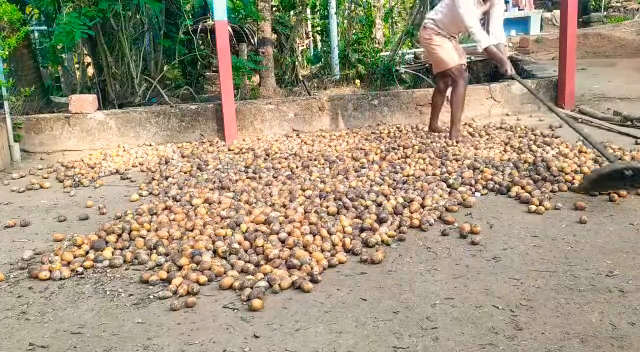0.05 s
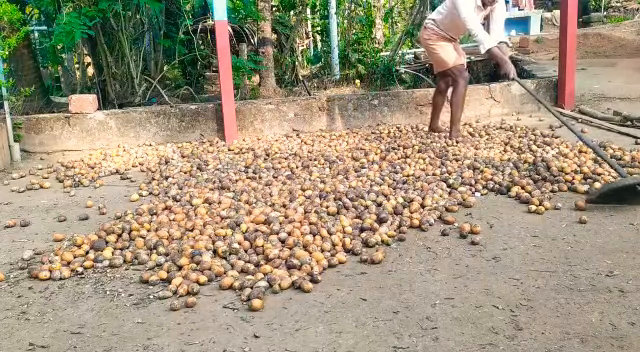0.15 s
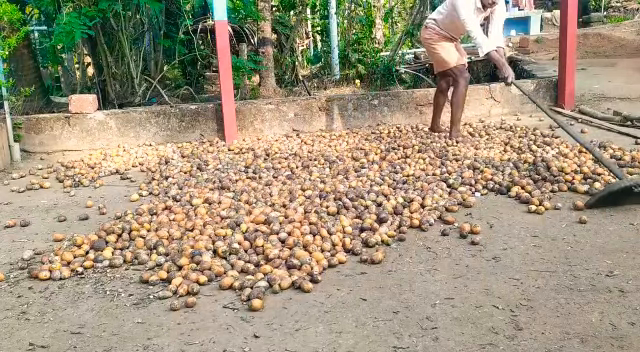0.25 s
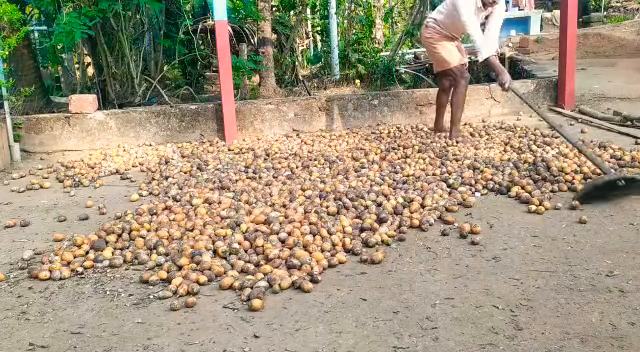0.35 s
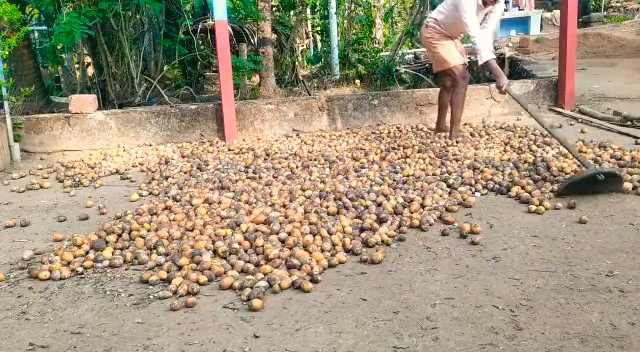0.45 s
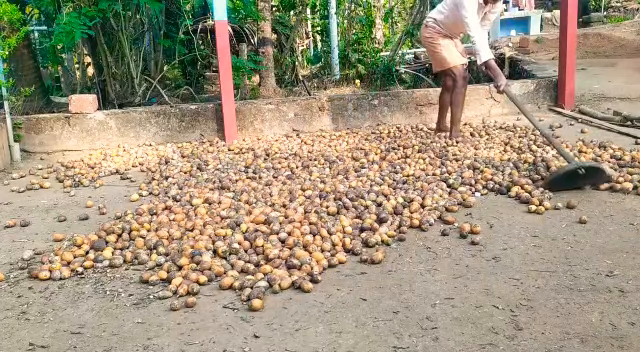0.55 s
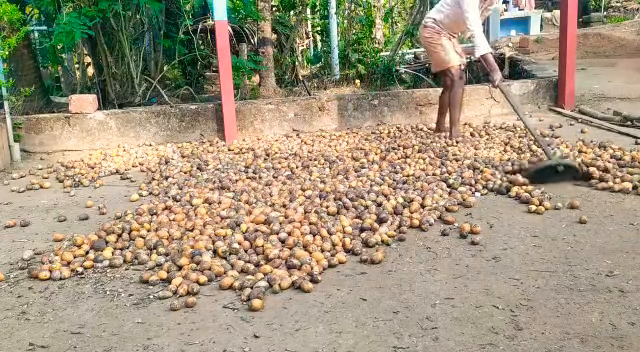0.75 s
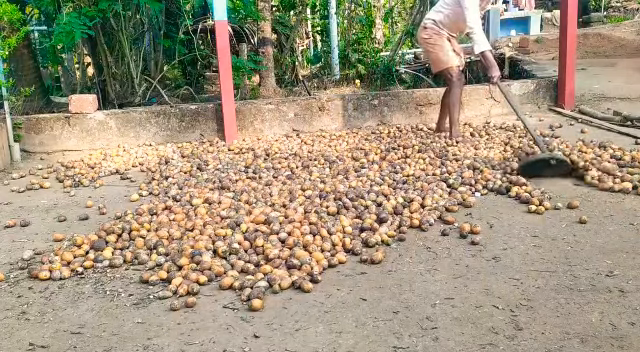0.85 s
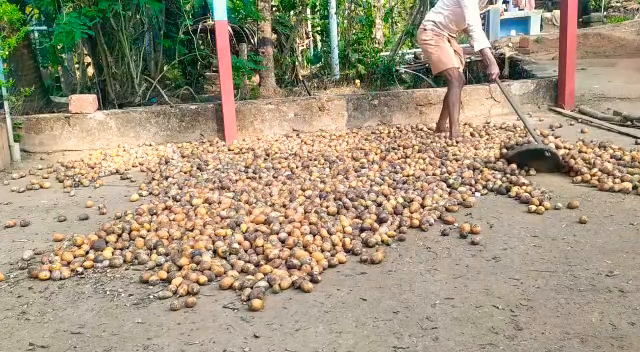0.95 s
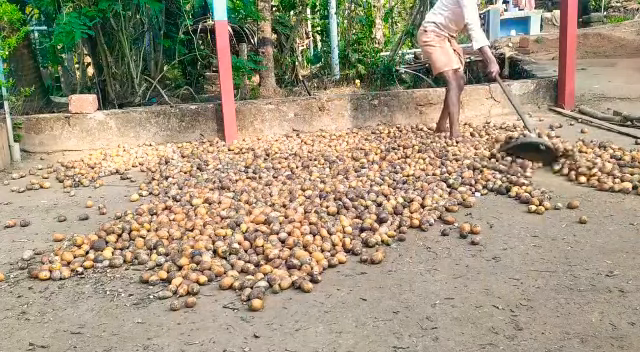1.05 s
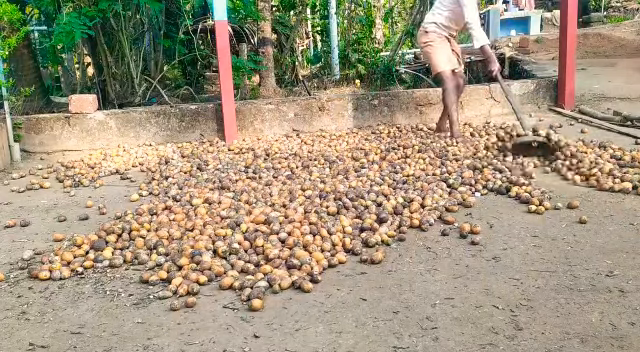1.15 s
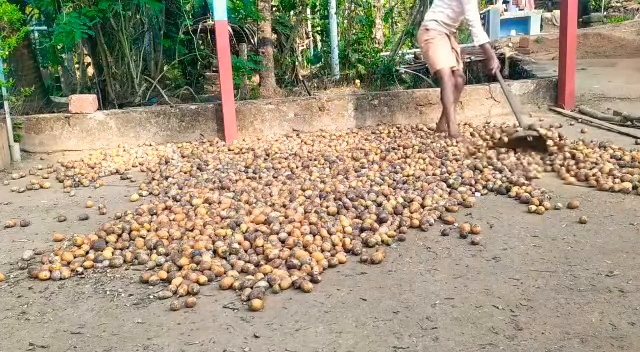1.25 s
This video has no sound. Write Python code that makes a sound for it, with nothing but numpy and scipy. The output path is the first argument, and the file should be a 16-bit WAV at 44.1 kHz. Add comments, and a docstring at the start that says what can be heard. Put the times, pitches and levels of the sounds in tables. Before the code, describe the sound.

Dried nuts clatter as a long-handled scraper rakes them outdoors. First the blade smacks the paving, then hollow husks and hard shells knock irregularly against it and roll together while the edge grinds grit with a low rumble.

```python
"""A long-handled scraper drops on a paved yard and is pulled through a heap of dried nuts.
The blade smacks down, chatters and rings in its modes. Nuts knock on it and tumble over each
other, ringing their hollow husks and hard shells. The edge grinds grit, flicks pebbles and
rumbles. Blows carry a faint yard echo; faint outdoor air lies underneath."""
import sys
import numpy as np
from scipy import signal
from scipy.fft import rfft, irfft
from scipy.io import wavfile
from scipy.ndimage import uniform_filter1d

SR = 44100
rng = np.random.default_rng(int(sys.argv[2]) if len(sys.argv) > 2 else 0)


def to_wav(sig):
    """Store sig (one row per channel, or 1-D mono) as 16-bit WAV at the path in sys.argv[1].

    Samples outside -1..1 are clipped; the rate is SR.
    """
    pcm = np.clip(np.atleast_2d(sig), -1, 1) * 32767
    pcm = np.round(pcm).astype(np.int16)
    wavfile.write(sys.argv[1], SR, pcm.T)  # frames by channels


N = 57330
T = np.arange(N) / SR
DROP_S, BOUNCE_S = 0.2169, 0.0078
GRIT_CORRELATION = 0.036

# blade contacts (time [s], smack [dB], ring [dB])
LANDINGS = [(DROP_S, -7.5, -17), (DROP_S + BOUNCE_S, -11.5, -24.5), (0.22, -42, -36), (0.2455, -24, -25.5),
            (0.2522, -23.5, -35), (0.24, -30.5, -39), (0.34, -37, -38), (0.299, -38, -44)]
# damped modes of the grounded blade (frequency [Hz], level [dB], t60 [s])
SMACK_MODES = [(345, -2.5, 0.019), (793, 4.5, .02), (975, -3, 0.021), (1610, -6.5, 0.019)]
# ringing blade modes, one list per column (frequency [Hz], level [dB], t60 [s])
BLADE_HZ = [158, 195, 232, 295, 369, 506, 670, 752, 778, 897, 1018, 1328, 1537, 1800]
BLADE_DB = [-14, -12.5, -11, -6.5, -9, -11.5, -1, -9, -3, -9.5, -20.5, -16.5, -12.5, -12]
BLADE_T60_S = [0.14, 0.15, .13, 0.14, 0.033, 0.093, 0.11, 0.054, 0.13, 0.14, 0.15, 0.082, 0.065, 0.15]
BLADE_MODES = list(zip(BLADE_HZ, BLADE_DB, BLADE_T60_S))
# nuts on the blade (time [s], thud [dB], clack [dB], snap [dB], thud pitch [Hz])
KNOCKS = [(0.3568, -24.5, -32, -36.5, 340), (0.385, -35, -48, -41, 315), (0.4158, -21, -37, -33, 324),
          (0.4441, -31, -44, -42, 282), (0.48, -30.5, -35, -37.5, 380), (0.508, -38, -50, -34.5, 253),
          (0.526, -24, -23.5, -30.5, 415), (0.5349, -22.5, -26, -33, 325), (0.548, -48, -35, -54, 510),
          (0.554, -38, -28, -53, 345), (0.563, -28, -27, -64, 397), (0.5979, -32, -39.5, -35, 454),
          (0.6016, -40, -29.5, -37, 410), (0.619, -28.5, -36.5, -45.5, 403), (0.6998, -24, -46, -36.5, 383),
          (0.749, -28, -31, -47, 374), (0.806, -22.5, -29, -34.5, 460), (0.8219, -23.5, -27.5, -36, 405),
          (0.8371, -27, -36.5, -59, 410), (0.8804, -23, -33.5, -54, 330), (0.9089, -34, -37, -48, 374),
          (0.935, -47, -35, -36.5, 394), (1.0168, -30, -44, -37, 450), (1.0398, -30.5, -34, -33.5, 357),
          (1.0592, -34.5, -28.5, -38, 358), (1.0716, -42, -37, -32, 425), (1.0889, -34, -30, -39.5, 330),
          (1.1211, -33.5, -35, -41, 346), (1.135, -34, -33.5, -38, 340), (1.2216, -28, -39, -39, 308),
          (1.2619, -43, -45, -45, 308)]
# hollow husk (frequency [Hz], level [dB], t60 [s])
HUSK_MODES = [(288.6, -10, 0.055), (444, -4, 0.035), (485, -10, 0.043), (674.8, -5.5, 0.071),
              (808, -7, 0.021), (883, -7, 0.026)]
# hard shell (frequency [Hz], level [dB], t60 [s])
SHELL_MODES = [(1367, -4, .022), (1515, -8.5, 0.021), (1730, -9, 0.025), (2280, -10, 0.029)]
# tumbling of the heap (time [s], level [dB])
TUMBLE_ENVELOPE = [(0.22, -73), (0.3, -51), (0.4, -41), (0.47, -52.5), (0.535, -32), (0.59, -52.5),
                   (0.66, -44.5), (0.74, -41), (0.84, -41.5), (0.97, -50), (1.05, -43.5), (1.17, -42.5),
                   (1.3, -42)]
# edge grinding on paving (time [s], level [dB])
SCRAPE_ENVELOPE = [(0.2, -70), (0.206, -64), (0.218, -58), (0.238, -34.5), (0.344, -56.5), (0.408, -57.5),
                   (0.414, -52.5), (0.474, -60.5), (0.536, -43.5), (0.566, -45), (0.572, -50.5),
                   (0.852, -50.5), (0.952, -54.5), (1.142, -49), (1.154, -42), (1.254, -49), (1.3, -49.5)]
# grit under the pressed blade (frequency [Hz], level [dB])
COARSE_SPECTRUM = [(880, -25), (1500, -2), (1990, -9), (2220, -6.5), (3540, -1.5), (4100, -6), (4710, -2.5),
                   (7520, -9), (8370, -7), (13100, -19.5), (15500, -26)]
# grit under the skimming blade (frequency [Hz], level [dB])
FINE_SPECTRUM = [(880, -46), (1500, -6.5), (1700, -11.5), (1880, -15), (2640, -6.5), (3650, -4.5),
                 (4850, -2.5), (8050, 0.5), (15500, -16)]
# grit balance (frequency [Hz], left minus right [dB])
GRIT_BALANCE = [(1500, -5), (3500, 1.5), (8000, 2.5), (13000, 0.5)]
# pebble pings (frequency [Hz], level [dB])
PEBBLE_MODES = [(2350, 0.5), (2750, -8), (3250, 3.5), (3590, 9.5), (4500, 1), (4900, 3.5), (5600, -11),
                (6300, 0), (7200, -12), (8300, -9), (9300, -22), (11500, -11)]
# larger grit cracking (time [s], level [dB])
CRUSHES = [(0.233, -35), (0.2385, -40), (0.29, -47), (0.529, -38), (0.563, -49), (0.81, -50),
           (0.832, -44.5), (0.868, -44), (1.187, -43)]
# drag rumble (time [s], level [dB])
RUMBLE_ENVELOPE = [(0, -90), (0.2, -83), (0.225, -67), (0.28, -70), (0.42, -45), (0.48, -51), (0.535, -39),
                   (0.6, -54.5), (0.72, -50.5), (0.85, -56), (1.0, -64.5), (1.17, -57), (1.25, -55.5),
                   (1.3, -48)]
# drag rumble (frequency [Hz], level [dB])
RUMBLE_SPECTRUM = [(30, -22), (48, 7.5), (64, -1.5), (95, 0.5), (165, 1), (300, -7), (900, -60)]
# outdoor air (frequency [Hz], level [dB])
AIR_SPECTRUM = [(15, -23), (25, -32), (62, 2), (188, -17), (399, -14), (703, -22.5), (919, -13),
                (1170, -32.5), (1530, -25.5), (1710, -31.5), (3720, -26.5), (12200, -34), (15500, -54)]
# outdoor air (frequency [Hz], left-right correlation [ratio])
AIR_CORRELATION = [(300, 0.97), (700, 0.46), (2000, 0.083)]
# antiphase bands of the two microphone ports (centre [Hz], width [Hz])
PORT_BANDS = [(630, 103), (1100, 195), (1720, 270), (2450, 267)]


def landing(crack_db=-15.5):
    """The blade smacks the paving, cracks grit, bounces and rings."""
    times_s, smack_db, ring_db = np.transpose(LANDINGS)
    smacks = strike(times_s, smack_db, SMACK_MODES, vary_db=0)
    rings = strike(times_s, ring_db, BLADE_MODES, vary_db=1)
    cracks = crunch(times_s, smack_db + crack_db, t60_s=0.079)
    return ports(soften(smacks + rings)) + soften(cracks)


def knocks(thud_rise_cycles=0.49):
    """Nuts hit the blade: soft thud, husk clack, blade ring, shell snap, gritty tick."""
    times_s, thud_db, clack_db, snap_db, pitch_hz = np.transpose(KNOCKS)
    thuds = 0
    for start_s, db, hz in zip(times_s, thud_db, pitch_hz):
        cycles = np.maximum(T - start_s, 0) * hz
        rise = cycles / thud_rise_cycles
        swell = (rise * np.exp(1 - rise)) ** 2
        thuds += from_db(db + 1.5) * swell * np.sin(2 * np.pi * cycles)
    clacks = strike(times_s, clack_db + 2, HUSK_MODES, vary_db=2.5)
    rings = strike(times_s, clack_db - 17.5, BLADE_MODES, vary_db=5)
    snaps = strike(times_s, snap_db + 1, SHELL_MODES, vary_db=2)
    ticks = crunch(times_s, snap_db - 14.5, t60_s=0.012)
    return ports(thuds + soften(clacks + rings + snaps)) + ticks


def tumbling(shell_db=-11.5, pitch_spread=0.053, side_gain=0.17):
    """Nuts of three sizes collide as they roll ahead of the blade."""
    modes = HUSK_MODES + [(hz, db + shell_db, t60_s) for hz, db, t60_s in SHELL_MODES]
    mid, side = 0, 0
    for pitch_ratio in np.exp(pitch_spread * np.array([-1, 0, 1])):
        hits = grains(rate_per_s=260, spread_db=1.5)
        for hz, db, t60_s in modes:
            drive = hits * rng.uniform(-1.006, 1, (2, N))
            rings = from_db(db) * ring(drive, hz * pitch_ratio, t60_s)
            mid += rings[0]
            side += rings[1] * min(hz / 700, 1) ** 2
    heap = soften(ports(mid) + side_gain * side * [[1], [-1]])
    return unit_rms(heap) * envelope(TUMBLE_ENVELOPE)


def scraping(skim_start_s=1.074, skim_fade_s=0.065):
    """The edge grinds the paving from touchdown on, finer once it skims."""
    skim = np.clip((T - skim_start_s) / skim_fade_s, 0, 1)
    edge = np.sqrt(1 - skim) * grit(COARSE_SPECTRUM) + np.sqrt(skim) * grit(FINE_SPECTRUM) + pebbles()
    balance = from_db(per_bin(GRIT_BALANCE) * [[0.5], [-0.5]])
    grounded = T > DROP_S
    return fft_filter(edge, balance) * envelope(SCRAPE_ENVELOPE) * catching() * grounded


def grit(spectrum, crack_db=-4, hiss_db=-1, stereo_scatter=6.4):
    """Grains crack under the edge, over a hiss of the same colour."""
    hits = grains(rate_per_s=2600, spread_db=0) * (1 + stereo_scatter * rng.standard_normal((2, N)))
    cracks = unit_rms(fft_filter(hits, from_db(per_bin(spectrum))))
    return from_db(crack_db) * cracks + from_db(hiss_db) * noise(spectrum, GRIT_CORRELATION)


def pebbles(relative_db=-8):
    """Small stones flicked by the edge ring briefly."""
    pings = 0
    for hz, db in PEBBLE_MODES:
        flicks = grains(rate_per_s=130, spread_db=4.5) * rng.standard_normal((2, N))
        pings += from_db(db) * ring(flicks, hz, t60_s=0.074)
    return from_db(relative_db) * unit_rms(pings)


def catching(spread_db=1, catch_s=0.011):
    """Uneven gain as the edge catches and slips."""
    wander = uniform_filter1d(rng.standard_normal(N), int(catch_s * SR))
    return from_db(spread_db * unit_rms(wander))


def crunch(times_s, db, t60_s):
    """A decaying burst of crushed grit per contact."""
    pole = np.exp(-np.log(1000) / (t60_s * SR))
    bursts = signal.lfilter([1], [1, -pole], clicks(times_s, db))
    return bursts * noise(COARSE_SPECTRUM, GRIT_CORRELATION)


def rumble():
    """Low noise of the dragged blade."""
    return envelope(RUMBLE_ENVELOPE) * noise(RUMBLE_SPECTRUM, correlation=0.99)


def yard_echo(x, gain_db=-14, t60_s=0.28, delay_s=0.0039, cutoff_hz=3230):
    """Faint, dull tail from the low wall and buildings."""
    tail = rng.standard_normal((2, N)) * np.exp(-np.log(1000) * T / t60_s) * (T > delay_s)
    tail = signal.sosfilt(signal.butter(2, cutoff_hz, fs=SR, output="sos"), tail)[0]
    return from_db(gain_db) * signal.fftconvolve(x, [tail / np.linalg.norm(tail)], axes=1)[:, :N]


def outdoor_air(level_db=-55):
    """Steady noise, centred in the bass, wide in the treble."""
    return from_db(level_db) * noise(AIR_SPECTRUM, per_bin(AIR_CORRELATION))


def strike(times_s, db, modes, vary_db):
    """Each contact rings every mode; strengths scatter by vary_db."""
    scatter_db = vary_db * rng.standard_normal((len(times_s), len(modes)))
    return sum((-1) ** k * ring(clicks(times_s, db + mode_db + scatter_db[:, k]), hz, t60_s)
               for k, (hz, mode_db, t60_s) in enumerate(modes))


def ring(x, hz, t60_s):
    """One mode: a unit click starts a decaying unit sine."""
    radius, angle = np.exp(-np.log(1000) / (t60_s * SR)), 2 * np.pi * hz / SR
    return signal.lfilter([0, np.sin(angle)], [1, -2 * radius * np.cos(angle), radius ** 2], x + 1e-18)


def soften(x, cutoff_hz=2430):
    """Finite contact time rounds the attack."""
    return signal.sosfilt(signal.butter(2, cutoff_hz, fs=SR, output="sos"), x)


def ports(x):
    """Two microphone ports hear some bands in antiphase."""
    pair = [x, x]
    for k, (hz, width_hz) in enumerate(PORT_BANDS):
        band = signal.lfilter(*signal.iirpeak(hz, hz / width_hz, fs=SR), pair[k % 2])
        pair[k % 2] = pair[k % 2] - 2 * band
    return np.array(pair)


def clicks(times_s, db):
    """One impulse per contact."""
    return np.bincount(np.clip(times_s * SR, 0, N - 1).astype(int), from_db(db), N)


def grains(rate_per_s, spread_db):
    """Random impulses; spread_db makes a few larger."""
    sizes = from_db(spread_db * np.minimum(rng.exponential(1, N), 4)) * rng.choice([-1, 1], N)
    return sizes * (rng.random(N) < rate_per_s / SR)


def noise(spectrum, correlation):
    """Coloured stereo noise, unit power."""
    gain = from_db(per_bin(spectrum))
    mid, side = rng.standard_normal((2, N))
    mid = fft_filter(mid, gain * np.sqrt(1 + correlation))
    side = fft_filter(side, gain * np.sqrt(1 - correlation))
    return unit_rms(mid + side * [[1], [-1]])


def fft_filter(x, gain):
    """One gain per bin, zero-padded."""
    return irfft(rfft(x, 2 * N) * gain)[..., :N]


def per_bin(points):
    """Table value at each FFT bin, interpolated over log frequency."""
    hz, value = np.transpose(points)
    bin_hz = np.arange(N + 1) * SR / (2 * N)
    return np.interp(np.log(bin_hz + 1), np.log(hz), value)


def envelope(points):
    """Gain from (time [s], level [dB])."""
    return from_db(np.interp(T, *np.transpose(points)))


def unit_rms(x):
    """Scale to unit power."""
    return x / np.sqrt(np.mean(x ** 2) + 1e-20)


def from_db(db):
    """Decibels to gain."""
    return 10 ** (np.asarray(db) / 20)


def scene():
    """Blade, nuts and grit in the open yard."""
    blows = landing() + knocks()
    air = outdoor_air()
    echo = yard_echo(blows)
    pull = tumbling() + scraping() + rumble()
    crushes = crunch(*np.transpose(CRUSHES), t60_s=0.022)
    return blows + pull + crushes + echo + air


def record(dry, low_cut_hz=62, high_cut_hz=15500):
    """Cut deep bass and top treble."""
    dry = signal.sosfilt(signal.butter(2, low_cut_hz, "high", fs=SR, output="sos"), dry)
    return signal.sosfilt(signal.ellip(10, 0.1, 80, high_cut_hz, fs=SR, output="sos"), dry)


dry = scene()
out = record(dry)
to_wav(out)
```